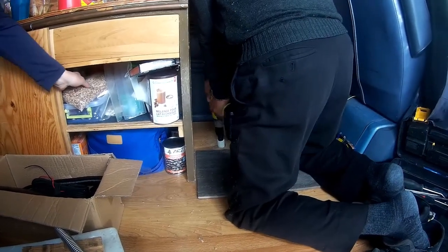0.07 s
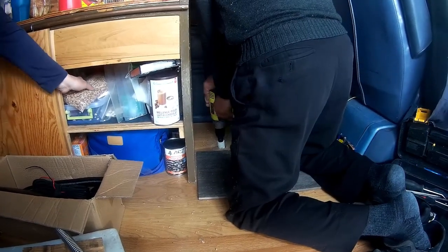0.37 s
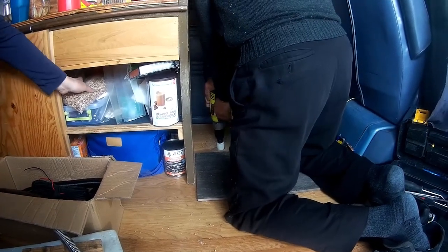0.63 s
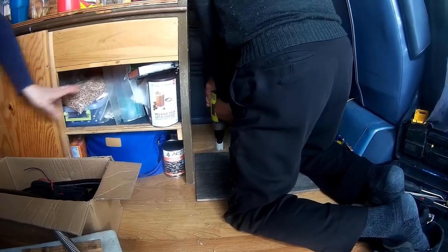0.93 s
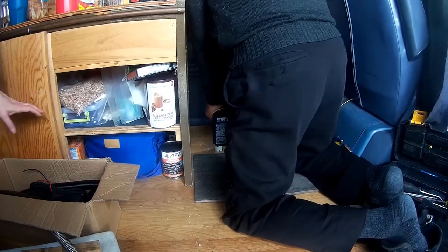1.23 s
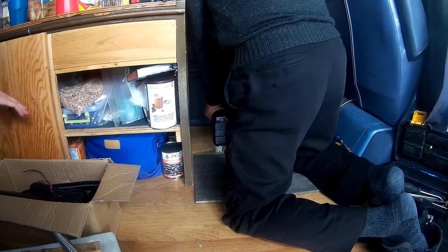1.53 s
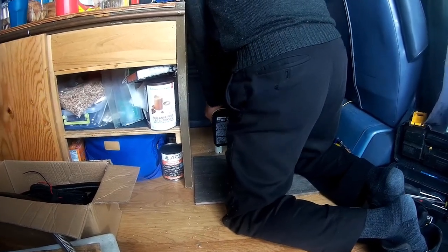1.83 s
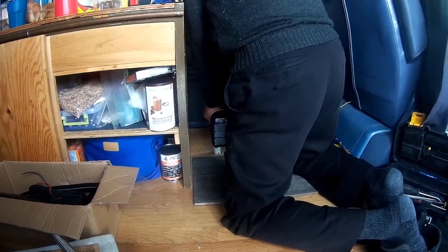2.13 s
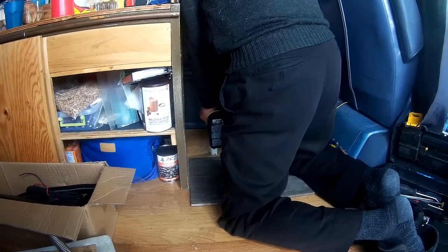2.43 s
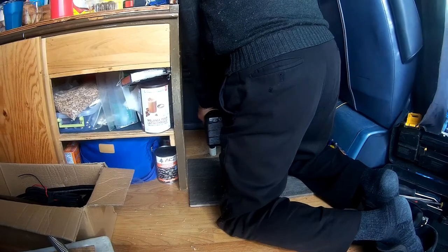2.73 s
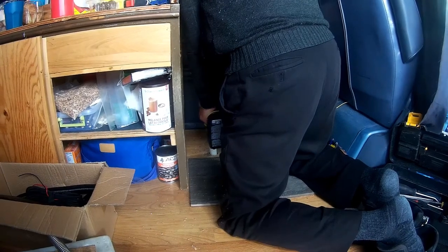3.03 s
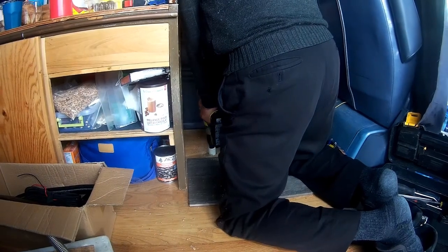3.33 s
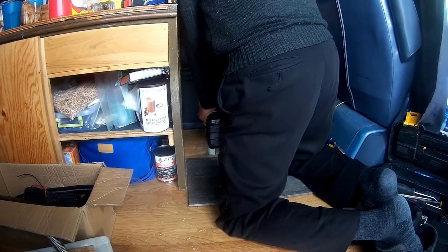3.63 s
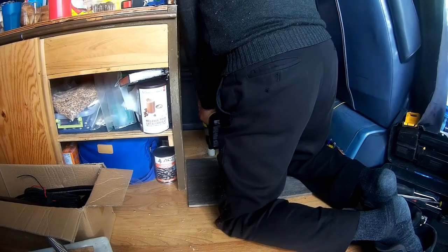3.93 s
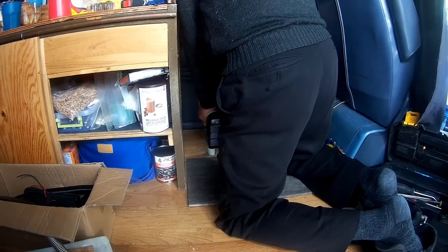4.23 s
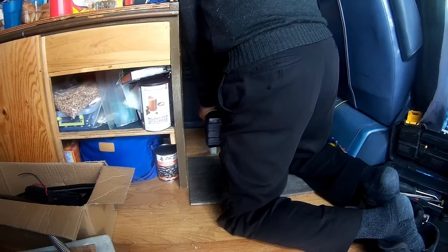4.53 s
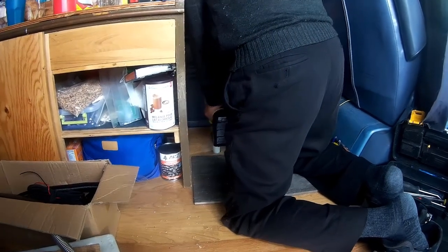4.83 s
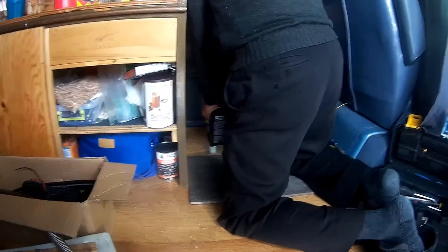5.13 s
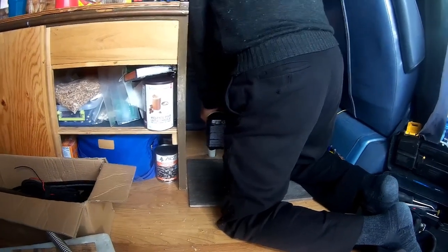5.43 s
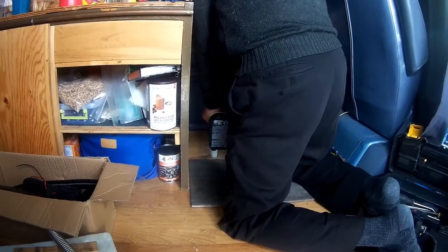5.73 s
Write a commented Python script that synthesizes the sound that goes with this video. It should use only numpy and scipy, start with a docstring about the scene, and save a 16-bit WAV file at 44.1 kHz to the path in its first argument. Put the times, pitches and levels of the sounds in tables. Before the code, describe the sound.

A cordless drill grinds a hole saw into a van's steel floor, stops briefly, then cuts again with a whine and rough chatter.

```python
"""A cordless drill drives a hole saw into the steel floor of a van, whose small cabin adds a dry echo.
From the start the teeth grind, ring the saw cup and boom the floor panel whenever they catch, while
the gear whine sags with the load. At 0.9 s the labouring drill is braked, and the saw scrapes in its
groove as it is reseated. At 2.65 s it cuts again, faster; from 3.3 s the cup builds up a rough chatter,
and the gears howl as the saw binds."""
import sys
import numpy as np
from scipy import signal
from scipy.fft import rfft, irfft
from scipy.io import wavfile

SR = 44100
rng = np.random.default_rng(int(sys.argv[2]) if len(sys.argv) > 2 else 0)


def output_pcm(signal):
    """Save a mono or channel-first signal as 16-bit PCM at the path in sys.argv[1].

    Samples are clipped to [-1, 1] before scaling.
    """
    pcm = np.clip(np.atleast_2d(signal).T, -1, 1) * 32767
    wavfile.write(sys.argv[1], SR, np.round(pcm).astype(np.int16))


N = 259308
TIME = np.arange(N) / SR
BINS = np.fft.rfftfreq(N, 1 / SR)

# murmur of the resting van: (frequency [Hz], relative density [dB])
MURMUR_SPECTRUM = [(12, -55), (20, 3), (42, 1.5), (59, -9.5), (101, -4.5), (246, -5), (291, -4.5),
                   (385, -11), (481, -10), (553, -15), (692, -14), (1940, -29.5), (2870, -33),
                   (15800, -34.5)]
# low shudder of the cut: (frequency [Hz], relative density [dB])
SHUDDER_SPECTRUM = [(10, -13), (30, 0), (52, -12), (74, -9.0), (100, -9), (200, -46), (600, -80)]
# hiss of the chips: (frequency [Hz], relative density [dB])
CHIP_SPECTRUM = [(1500, -6.5), (2800, 5.5), (3600, 1), (4050, -1), (4480, 1.5), (5000, -7), (5800, -4),
                 (6650, 1), (7300, -6.5), (8700, -12.5), (9500, -11), (11200, -22), (13000, -18),
                 (15800, -35)]
# reverberation of the cabin: (frequency [Hz], time to fall 60 dB [s])
CABIN_DECAY = [(150, 0.24), (1000, 0.26), (8000, 0.026)]
# the motor under the weight of the arm, one list a cut: (time [s], rotor speed [Hz])
ROTOR_SPEEDS = [
    [(0.0, 258), (0.1, 272), (0.17, 257), (0.24, 254), (0.29, 222), (0.37, 197), (0.57, 196), (0.61, 170),
     (0.67, 157), (0.78, 159), (0.8, 139), (0.88, 145)],
    [(2.65, 300), (3.35, 316), (3.44, 284), (3.65, 279), (3.85, 263), (4.22, 262), (4.5, 270), (4.58, 256),
     (5.7, 264), (5.88, 254)],
]
# the saw binds and drags the motor down: (time of deepest sag [s], sag [Hz])
SPEED_SAGS = [(0.36, 19.2), (0.526, 6.1), (0.719, 21.4), (0.821, 7.5), (0.92, 14.3), (3.549, 7), (3.69, 11),
              (3.774, 12.8), (3.9, 16), (4.004, 16), (4.12, 21), (4.24, 17), (4.681, 21), (4.826, 16),
              (4.919, 19), (5.051, 9.8), (5.16, 29.5), (5.289, 16.8), (5.401, 28.6), (5.758, 10.7),
              (5.87, 27)]
# how hard the teeth are pressed into the steel, one list a cut: (time [s], feed [dB])
FEED_PRESSURE = [
    [(0.0, -2.5), (0.08, 1), (0.2, -2.5), (0.33, -4), (0.55, 0.5), (0.73, -3.5), (0.8, 1), (0.9, -1)],
    [(2.66, -9), (2.74, -14.5), (2.85, -1.5), (3.25, 1), (3.8, 0), (4.15, 0.5), (4.85, 1.5), (5.0, -1),
     (5.5, 1.5), (5.88, 1)],
]
# low gear tones: (multiple of rotor speed [1], level against the grinding [dB])
GROWL_ORDERS = [(2, -19), (4, -10)]
# how well the drill body radiates a gear tone: (frequency [Hz], gain [dB])
BODY_RADIATION = [(1200, -20), (1320, -12), (1500, -8.5), (1750, -15), (1940, -1), (2100, -6), (2200, -2),
                  (2290, 0.5), (2400, -5.5), (2540, -3.5), (2850, -10.5), (3500, -11), (3800, -22),
                  (4200, -18), (4500, -18), (5200, -37)]
# the gears howl as the saw runs hard against the groove wall: (start [s], length [s], rise [dB])
GEAR_HOWLS = [(0.14, 0.16, 5), (0.81, 0.26, 4.5), (3.86, 0.19, 7), (4.091, 0.18, 6), (4.549, 0.14, 7),
              (4.725, 0.16, 3)]
# scraping strokes: (start [s], length [s], level [dB], resonance [Hz], its relative level [dB])
SCRAPE_STROKES = [(0.936, 0.087, -43.5, 1880, -3), (1.238, 0.051, -55.5, 1250, -12),
                  (1.303, 0.039, -48.5, 660, 2), (1.326, 0.05, -52, 670, -3),
                  (1.501, 0.025, -50, 1510, -20), (1.548, 0.23, -56.5, 1190, -4),
                  (2.126, 0.064, -51, 655, 2), (2.191, 0.03, -55.5, 700, -6),
                  (2.655, .04, -39.5, 1154, -17), (2.718, 0.11, -36, 1134, 8), (2.74, 0.59, -36, 250, 5),
                  (2.817, 0.041, -31, 1172, 12), (2.927, 0.026, -25, 1270, 10),
                  (3.236, 0.064, -30.5, 420, 13)]
# teeth catching the rim of the cut: (time [s], relative peak level [dB])
TOOTH_CATCHES = [(0.049, -11), (0.083, -7), (0.144, -11), (0.194, -12), (0.249, -8), (0.78, -15.5),
                 (0.803, -16.5), (2.664, -27), (2.843, -8.5), (2.899, -13.5), (2.994, -34), (3.181, -12),
                 (3.421, -31), (3.662, -30), (3.902, -16), (4.13, -10), (4.329, -13), (4.423, -29),
                 (4.669, -31), (5.21, -24), (5.515, -17)]
# the chatter shifts as the drill leans: (time [s], frequency [Hz])
CHATTER_PITCH = [(3.9, 1150), (4.05, 1175), (4.45, 1160), (4.58, 1036), (4.7, 1148), (5.1, 1148),
                 (5.5, 1094), (5.82, 1049)]
# resonances of each body: (frequency [Hz], width [Hz], relative level [dB])
GEARBOX_MODES = [(1370, 39, -0.5), (1579, 53, 4), (1657, 22, 1), (1730, 89, -15.5), (1780, 52, -2.5),
                 (1927, 93, 1), (2040, 220, -8.5), (2295, 186, -2.5), (2614, 154, -8), (2795, 91, -4)]
LOADED_CASE_MODES = [(2630, 80, 5), (3050, 130, -3), (3330, 170, -1), (3580, 120, -3)]  # the gear case under heavy load
HOUSING_MODES = [(6540, 100, 11), (8850, 1040, -8)]
GROOVE_MODES = [(665, 120, -3.5), (1030, 400, -5.5), (1330, 120, -6), (1560, 110, -0.5), (2020, 170, -13)]
PANEL_MODES = [(74, 6.4, -16), (117, 15, -6.5), (135.3, 6, 0), (151.5, 18, -4.5), (179, 20, -8.5),
               (224, 35, -19.5)]
STEEL_MODES = [(266, 145, -8.5), (346, 38, -1), (450, 35, -1.5), (515, 88, -2.5), (519, 59, -0.5),
               (653, 36, -2.5), (719.5, 62, -8.5), (754, 33, -10), (897, 145, -8), (1420, 277, -10.5)]  # the steel round the cut
CUP_MODES = [(1063, 110, -7), (1140.5, 135, 1), (1252, 63, -1.5), (1316, 48, -11.5), (1420, 58, -6.5)]
# level laws: (base level [dB], slope against feed [dB/dB], exponent of speed [1])
BOOM_LAW, GRIND_LAW = (-31.5, 1.0, 0.0), (-30.5, 0.95, 0.55)
CUP_LAW, RATTLE_LAW = (-33, 0.58, 0.54), (-34.5, 0.61, -0.071)

RELEASE_S, RESTART_S = 0.9, 2.648  # the trigger is let go and pulled again
BRAKE_S, COAST_S, SPIN_UP_S = 0.03, 0.25, 0.02
COAST_SPEED, COAST_DB = 0.4, -14.5  # share of speed and level left after the brake
FREE_HZ, SAG_S, RECOVER_S = 329.5, 0.05, 0.06  # unloaded rotor speed; fall and recovery at a snag
CUP_DB_PER_S, BOOM_DB_PER_S = 0.68, -1.08  # a deepening groove rubs the cup more and booms less
SLACK_LOAD, SLACK_RATTLE_DB, SLACK_WHINE_DB = 0.12, -10.5, -16.5  # below this load, slack gears quieten
MESH_DB, OCTAVE_DB = -36, -40  # gear tones before radiation and strain
STALL_RISE_DB, WHINE_PER_FEED = 24, 0.43  # whine rises towards a stall, and in dB per dB of feed
RASP_FROM_HZ, RASP_FULL_HZ, RASP_DB = 200, 197, -11  # rotor speeds; level against the rattle
CHATTER_FROM_S, CHATTER_GROWS_S, CHATTER_DB = 3.33, 0.75, -1.5  # level against the cup envelope
DRONE_HZ, DRONE_DB = 131.8, -5  # main panel mode; level against the boom envelope


def gain_of(db):
    """Amplitude grows tenfold every 20 dB."""
    return 10 ** (np.asarray(db) / 20)


def unit_rms(x):
    """Normalisation to unit mean power."""
    return x / np.sqrt(np.mean(x ** 2) + 1e-20)


def at_frequency(points, hz):
    """Interpolation of a table along a logarithmic frequency axis."""
    f, value = np.transpose(points)
    return np.interp(np.log(hz + 1), np.log(f + 1), value)


def add(mix, s, sound):
    """Superposition: a sound joins the mix at time s."""
    part = mix[max(round(s * SR), 0):][:len(sound)]
    part += sound[:len(part)]


def coloured(x, spectrum):
    """Spectral shaping by a table, at unit rms."""
    return unit_rms(irfft(rfft(x) * gain_of(at_frequency(spectrum, BINS)), N))


def wander(rate_hz):
    """Low-pass noise: a random drift of unit rms, up to about rate_hz."""
    size = 8192
    hz = np.fft.rfftfreq(size, TIME[-1] / size)
    slow = irfft(rfft(rng.standard_normal(size)) / (1 + (hz / rate_hz) ** 4))
    return unit_rms(np.interp(TIME, np.linspace(0, TIME[-1], size), slow))


def frayed(angle, rough, width_hz):
    """Random modulation of amplitude and phase broadens a tone into a band."""
    tremble = (wander(width_hz) + 1j * wander(width_hz)) / np.sqrt(2)
    return ((1 + rough * tremble) * np.exp(1j * angle)).real / np.sqrt(1 + rough ** 2)


def ring(x, modes):
    """Forced resonance: modal powers add, and minimum phase keeps the response causal."""
    power = sum(gain_of(db) ** 2 / (1 + ((BINS ** 2 - f ** 2) / ((BINS + 1) * 1.62 * width)) ** 2) ** 2
                for f, width, db in modes)
    log_gain = np.log(power + 1e-9) / 2
    mirrored = np.concatenate([log_gain, log_gain[-2:0:-1]])
    response = np.exp(np.conj(signal.hilbert(mirrored)))
    return unit_rms(irfft(rfft(x) * response[:len(BINS)], N))


def tooth_noise(per_s, spread_db, rub):
    """Shot noise: teeth strike at random with uneven force, over steady friction."""
    strikes = rng.random(N) < per_s / SR
    sizes = gain_of(spread_db * np.minimum(rng.exponential(1, N), 4))
    clicks = strikes * sizes * rng.choice([-1, 1], N)
    return unit_rms(clicks) + rub * rng.standard_normal(N)


def van_murmur():
    """Stationary noise, strongest in the bass, fills the resting van."""
    return gain_of(-48) * coloured(rng.standard_normal(N), MURMUR_SPECTRUM)


def cabin_echo(x):
    """Reverberation: dense reflections decay exponentially, each band at its own rate."""
    size = SR // 4
    taps = rng.choice([-1., 1.], size) * (rng.random(size) < 1 / 20)
    taps *= np.arange(size) > SR // 400  # no reflection in the first 2.5 ms
    hz, t, bands = signal.stft(taps, SR, nperseg=256)
    decay = gain_of(-60 * t / at_frequency(CABIN_DECAY, hz)[:, None])
    tail = signal.istft(bands * decay, SR, nperseg=256)[1]
    return signal.fftconvolve(x, tail / np.linalg.norm(tail))[:N]


def shudder(grind):
    """Amplitude modulation: a low rumble follows the strength of the grinding."""
    return gain_of(-16.5) * grind * coloured(rng.standard_normal(N), SHUDDER_SPECTRUM)


def scrapes():
    """Sliding friction: the saw slips in its groove, each stroke with one prominent resonance."""
    out = np.zeros(N)
    grit = tooth_noise(per_s=830, spread_db=4.5, rub=0.98)
    groove = ring(grit, GROOVE_MODES)
    for s, length, db, hz, resonance_db in SCRAPE_STROKES:
        part = slice(round(s * SR), round((s + length) * SR))
        peak = signal.iirpeak(hz, hz / 200, fs=SR)  # 200 Hz wide on each pass
        resonance = unit_rms(signal.lfilter(*peak, signal.lfilter(*peak, grit[part])))
        stroke = groove[part] + gain_of(resonance_db) * resonance
        add(out, s, gain_of(db) * unit_rms(stroke) * signal.windows.tukey(len(stroke), .5))
    return out


def trigger():
    """Inertia: the saw coasts after the drive is braked. Both curves run from 0 to 1."""
    braked = RELEASE_S + BRAKE_S
    driving = np.interp(TIME, [RELEASE_S, braked, RESTART_S, RESTART_S + SPIN_UP_S], [1, 0, 0, 1])
    coasting = np.interp(TIME, [RELEASE_S, braked, RELEASE_S + COAST_S], [0, 1, 0])
    return driving, coasting


def rotor_speed():
    """Load torque slows the driven rotor at each snag, then it recovers; speed in Hz."""
    sag = sum(hz * np.interp(TIME, [s - SAG_S, s, s + RECOVER_S], [0, 1, 0]) for s, hz in SPEED_SAGS)
    return np.interp(TIME, *np.concatenate(ROTOR_SPEEDS).T) - sag


def envelopes(load, driving, coasting):
    """Excitation sets amplitude: the sources follow feed, load and the depth of the groove."""
    feed_db = np.interp(TIME, *np.concatenate(FEED_PRESSURE).T)
    moving = driving + gain_of(COAST_DB) * coasting
    boom, grind, cup, rattle = (moving * gain_of(db + slope * feed_db) * (1 - load) ** power
                                for db, slope, power in (BOOM_LAW, GRIND_LAW, CUP_LAW, RATTLE_LAW))
    cut_s = np.cumsum(moving) / SR
    boom *= driving * gain_of(BOOM_DB_PER_S * cut_s)
    cup *= gain_of(CUP_DB_PER_S * cut_s)
    slack = np.exp(-load / SLACK_LOAD)
    rattle *= gain_of(SLACK_RATTLE_DB * slack)
    howl_db = sum(db * np.sin(np.pi * np.clip((TIME - s) / length, 0, 1))
                  for s, length, db in GEAR_HOWLS)
    strain_db = STALL_RISE_DB * load + SLACK_WHINE_DB * slack + WHINE_PER_FEED * feed_db + howl_db
    return boom, grind, cup, rattle, driving * gain_of(strain_db)


def rattle_and_chips(turns, rattle):
    """Backlash impacts ring the gearbox, pulsing once a rotor turn; chip hiss grows with speed."""
    pulse = 1 + 0.059 * np.cos(2 * np.pi * turns)
    knocks = tooth_noise(per_s=3000, spread_db=2.5, rub=1.0) * pulse
    speed = np.gradient(turns) * SR
    hiss = gain_of(-6.5) * (speed / speed.max()) ** 0.69 * coloured(knocks, CHIP_SPECTRUM)
    return rattle * (ring(knocks, GEARBOX_MODES) + hiss)


def gear_whine(turns, rotor_hz, strain, grind, rattle):
    """Periodic forcing: gears mesh nine times a rotor turn, and uneven teeth broaden the harmonics."""
    angle = 2 * np.pi * turns
    mesh, mesh_hz = 9 * angle, 9 * rotor_hz
    tone = frayed(mesh, rough=.7, width_hz=60)
    octave = frayed(2 * mesh, rough=.9, width_hz=70)
    tone += gain_of(-10) * frayed(mesh, rough=1.5, width_hz=280)
    octave += gain_of(-13.5) * frayed(2 * mesh, rough=3.0, width_hz=220)
    tone *= gain_of(MESH_DB + at_frequency(BODY_RADIATION, mesh_hz))
    octave *= gain_of(OCTAVE_DB + at_frequency(BODY_RADIATION, 2 * mesh_hz))
    # heavily loaded gears rasp in their case
    labour = np.clip((RASP_FROM_HZ - rotor_hz) / (RASP_FROM_HZ - RASP_FULL_HZ), 0, 1)
    knocks = tooth_noise(per_s=1700, spread_db=3, rub=.9)
    rasp = gain_of(RASP_DB) * labour * ring(knocks, LOADED_CASE_MODES)
    growl = sum(gain_of(db) * frayed(k * angle, rough=0.9, width_hz=32) for k, db in GROWL_ORDERS)
    high_orders = sum(frayed(k * angle, rough=1.5, width_hz=130) for k in (24, 32))
    squeal = gain_of(-27) * ring(high_orders, HOUSING_MODES)  # heard as they sweep through a mode
    return strain * (tone + octave) + grind * growl + rattle * (rasp + squeal)


def panel_drone(boom):
    """Sustained excitation: the cut keeps the main mode of the floor panel swinging."""
    return gain_of(DRONE_DB) * boom * frayed(2 * np.pi * DRONE_HZ * TIME, rough=1.14, width_hz=12)


def tooth_catches():
    """Damped free vibration: a catching tooth plucks the floor panel, which swings a few cycles."""
    out, t = np.zeros(N), np.arange(SR // 6) / SR
    envelope = (1 - np.exp(-t / 0.0033)) * np.exp(-t / 0.016)
    for s, db in TOOTH_CATCHES:
        hz = 134 * (1 + 0.13 * rng.standard_normal())
        swing = np.sin(2 * np.pi * hz * t) * envelope
        add(out, s, gain_of(db - 9) * swing / abs(swing).max())
    return out


def cup_chatter(cup):
    """Self-excited vibration: teeth bouncing in step with the ringing cup give a rough tone."""
    hz = np.interp(TIME, *np.transpose(CHATTER_PITCH)) * (1 + 0.012 * wander(12.2))
    angle = 2 * np.pi * np.cumsum(hz) / SR
    grown = np.clip((TIME - CHATTER_FROM_S) / CHATTER_GROWS_S, 0, 1)
    return gain_of(CHATTER_DB) * grown * cup * frayed(angle, rough=1.2, width_hz=32)


def hole_saw(turns, boom, grind, cup):
    """Impact excitation: tooth blows drive the modes of the panel, the steel round the cut and the cup."""
    spindle = 2 * np.pi * turns / 15  # gear reduction of 15 to 1
    bite = np.sin(spindle + 0.71 * wander(4.4))  # the saw bites harder on one side
    blows = tooth_noise(per_s=1100, spread_db=2.5, rub=0.88)
    panel = gain_of(-1.5) * boom * ring(blows * gain_of(2 * bite), PANEL_MODES)
    steel = gain_of(0.5) * grind * ring(blows * gain_of(bite), STEEL_MODES)
    wall_rub = tooth_noise(per_s=1500, spread_db=-5.5, rub=1.0)  # the cup against the groove wall
    singing = ring((wall_rub + 0.83 * blows) * gain_of(0.31 * bite), CUP_MODES)
    drift_s = np.cumsum(.009 * wander(6.99)) / SR  # the pitch wavers as the rim rocks in the groove
    return panel + steel + gain_of(-1.5) * cup * np.interp(TIME + drift_s, TIME, singing)


def scene():
    """Superposition: gears and saw, turned by one rotor, add to their echo and the van's murmur."""
    driving, coasting = trigger()
    rotor_hz = rotor_speed()
    load = np.clip(1 - rotor_hz / FREE_HZ, 0, 1)
    jolts = 1 + 0.0061 * wander(35.3)  # the teeth jolt the speed
    turns = np.cumsum(rotor_hz * (driving + COAST_SPEED * coasting) * jolts) / SR
    boom, grind, cup, rattle, strain = envelopes(load, driving, coasting)
    gears = gear_whine(turns, rotor_hz, strain, grind, rattle) + rattle_and_chips(turns, rattle)
    work = hole_saw(turns, boom, grind, cup) + panel_drone(boom) + cup_chatter(cup) + gears + scrapes()
    background = shudder(grind) + van_murmur()
    echo = gain_of(-18) * cabin_echo(work)
    return (background + echo + work + tooth_catches())[None]


def record(dry):
    """Band limiting: a linear-phase low-pass removes the treble above 15750 Hz."""
    low_pass = signal.firwin(801, 15750, window=("kaiser", 9), fs=SR)
    return signal.oaconvolve(dry, low_pass[None], "same")


dry = scene()
out = record(dry)
output_pcm(out)
```